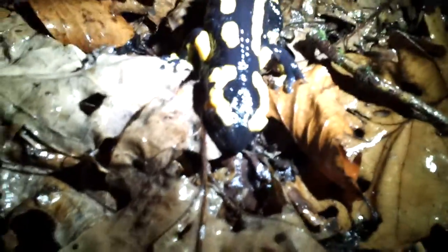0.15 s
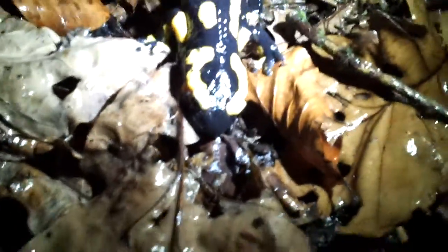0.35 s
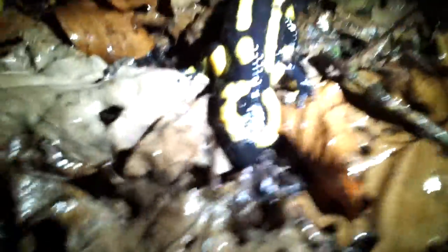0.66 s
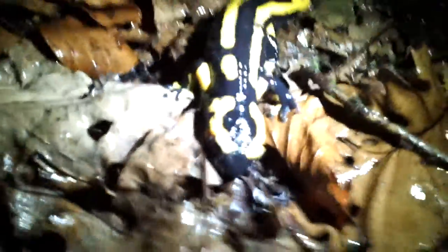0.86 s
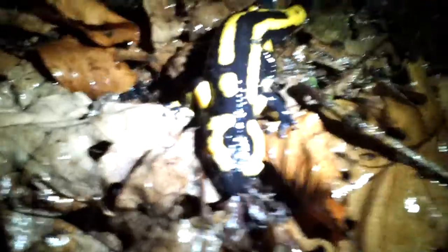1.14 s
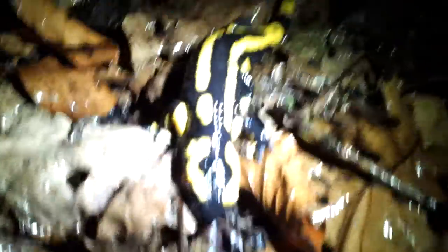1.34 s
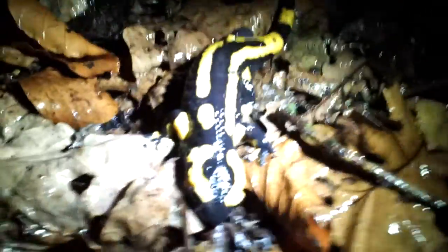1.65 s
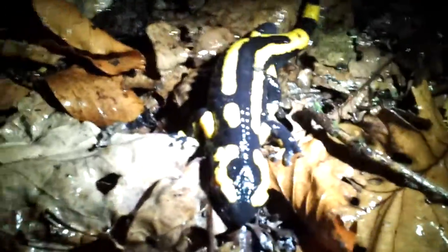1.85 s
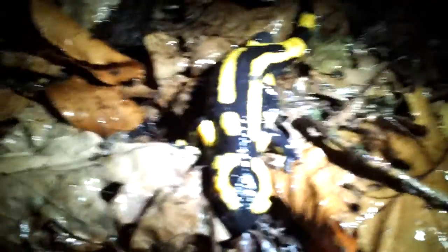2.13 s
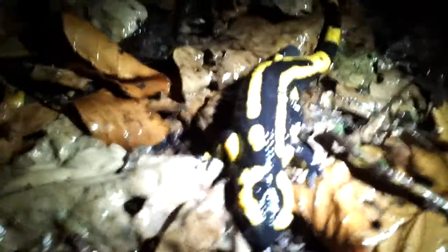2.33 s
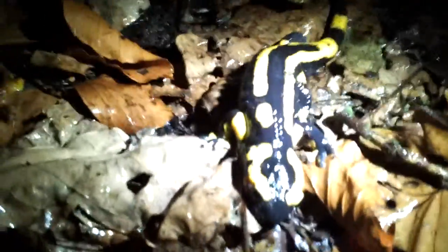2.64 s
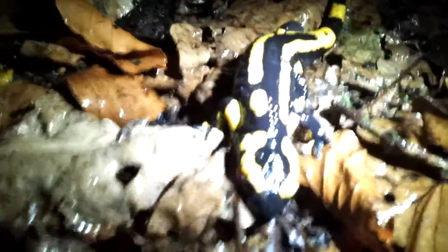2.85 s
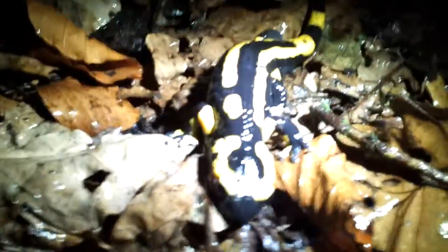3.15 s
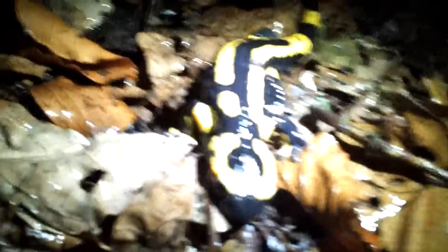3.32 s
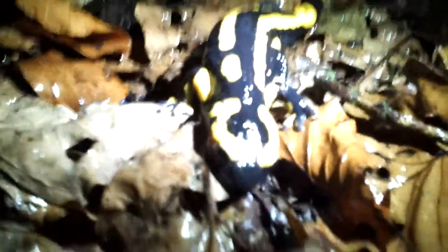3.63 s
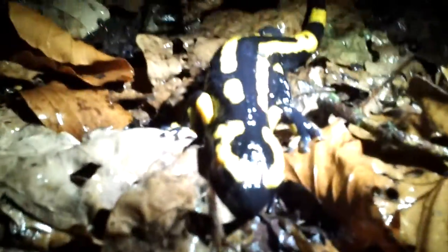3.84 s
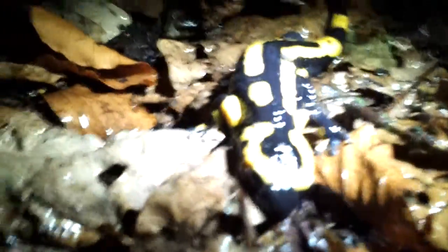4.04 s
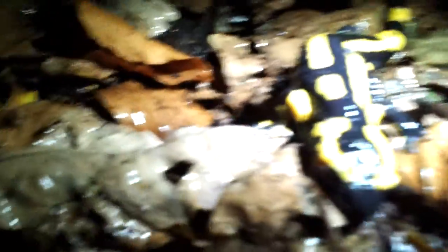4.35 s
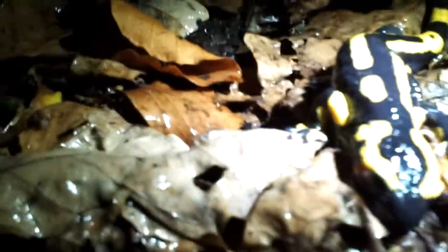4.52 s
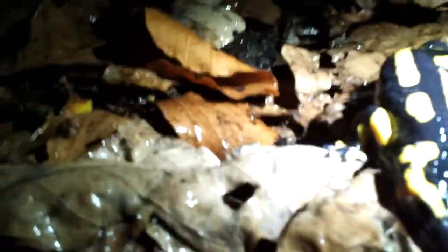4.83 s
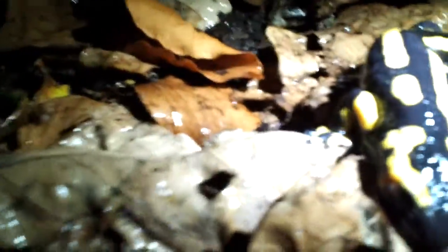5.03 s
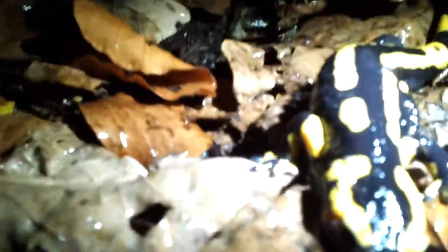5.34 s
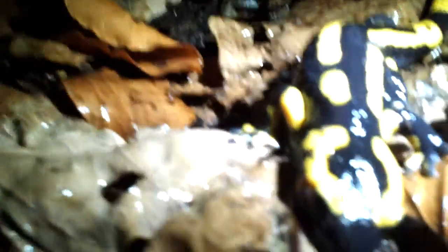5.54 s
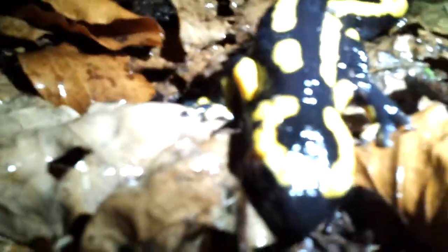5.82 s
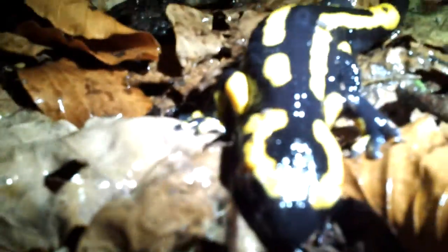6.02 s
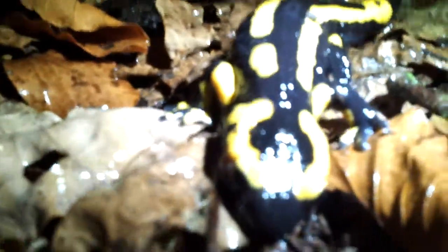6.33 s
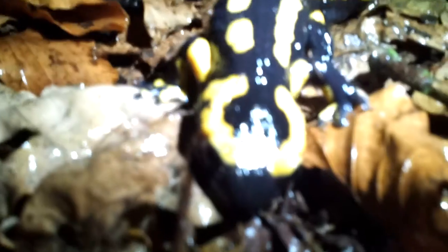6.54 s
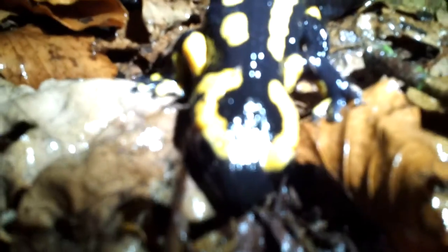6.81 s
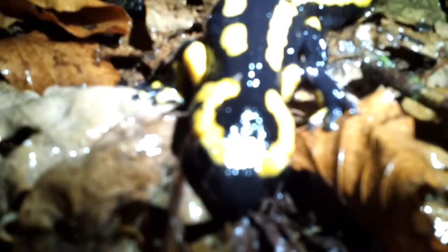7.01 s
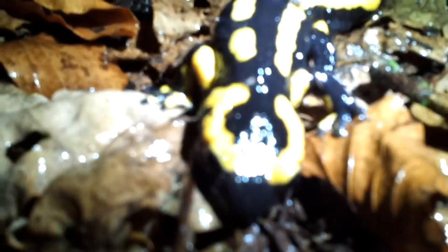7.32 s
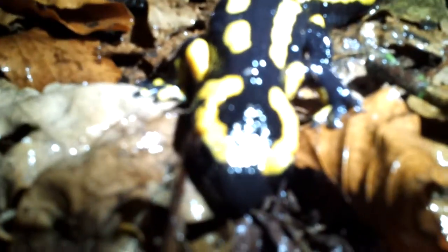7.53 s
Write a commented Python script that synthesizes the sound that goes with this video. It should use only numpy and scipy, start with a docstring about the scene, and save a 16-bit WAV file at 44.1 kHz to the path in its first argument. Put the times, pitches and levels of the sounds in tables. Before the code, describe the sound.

Steady rain on a wet forest floor: a constant airy hiss and fine patter of drops on leaves, with crisp ticks landing close by at irregular moments. A handheld microphone near the ground adds soft low rumble and faint knocks, over a distant roar that swells and sinks. Just before four seconds a finger brushes the device, ending in a loud thump with a short hollow ring, and the rain carries on.

```python
"""Steady rain on the wet leaf litter of a forest floor, heard from a hand-held camera close to the ground.
From the start there is the wash and hiss of far rain, made of filtered noise, under a fine patter of rung leaves.
The hand rumbles (deep noise) and knocks faintly on the case (dying swings); a far roar swells and sinks.
Near drops tick on single leaves as short noisy blows that set off resonances.
Just before 4 s the grip shifts: a finger brushes the camera (noisy slips) and bumps its case into ringing."""
import sys
import numpy as np
from scipy import signal
from scipy.fft import rfft, irfft, next_fast_len
from scipy.io import wavfile
from scipy.ndimage import uniform_filter1d

SR = 44100
rng = np.random.default_rng(int(sys.argv[2]) if len(sys.argv) > 2 else 0)


def inscribe(sig):
    """Save sig as 16-bit PCM at rate SR to the path in sys.argv[1].

    A 1-D sig is mono; a 2-D sig holds one channel per row.
    Samples are clipped to [-1, 1] before scaling.
    """
    pcm = np.round(np.clip(np.atleast_2d(sig).T, -1, 1) * 32767)
    wavfile.write(sys.argv[1], SR, pcm.astype(np.int16))


N = 338247  # length in samples

# How hard it rains. Each row: time in seconds, strength in dB.
RAIN_STRENGTH = [(0, -1), (.45, -0.5), (1.35, -0.5), (1.8, 2.5), (2.25, -0.1), (2.7, 0.3), (3.05, 1),
                 (3.6, 0.2), (4.9, -1), (5.2, 0.2), (5.65, -0.6), (6.15, 1.1), (6.65, -1), (7.67, -.8)]
# The finger lands, bears down hardest, bumps the case, and has left (seconds).
TOUCH_S, PRESS_S, BUMP_S, LIFT_S = 3.83, 3.9085, 3.9092, 3.966


def amp(db):
    """Turns dB into a gain."""
    return 10 ** (np.asarray(db) / 20)


def evened(x):
    """Scales a sound to an rms (average strength) of 1."""
    return x / np.sqrt(np.mean(x ** 2) + 1e-20)


def add(mix, s, sound):
    """Mixes a sound in at time s (seconds), cutting off what runs past the end."""
    start = max(round(s * SR), 0)
    part = mix[start:][:len(sound)]
    part += sound[:len(part)]  # part is a view, so this changes the mix itself


def level(rows):
    """Turns (seconds, dB) rows into a gain for every sample, with straight lines in dB between rows."""
    s, db = np.transpose(rows)
    return amp(np.interp(np.arange(N) / SR, s, db))


def colour(x, points):
    """Filters x by a spectrum given as (Hz, dB) points, joined along a logarithmic pitch scale."""
    size = next_fast_len(len(x) + 4096)
    f, db = np.transpose(points)
    log_hz = np.log(np.fft.rfftfreq(size, 1 / SR) + 1)  # + 1 avoids the logarithm of zero
    gain = amp(np.interp(log_hz, np.log(f), db))
    return irfft(rfft(x, size) * gain, size)[:len(x)]


def noise(points):
    """Noise of rms 1 with a given spectrum."""
    return evened(colour(rng.standard_normal(N), points))


def waver(depth_db, rate_hz, count=24):
    """A gain that drifts by chance: slow sines up to rate_hz are summed, and depth_db is their rms."""
    s = np.arange(0, N / SR + .02, .01)
    drift = np.zeros(len(s))
    for hz in np.geomspace(rate_hz / 10, rate_hz, count):
        drift += np.sin(2 * np.pi * (hz * s + rng.random()))
    return level(np.transpose([s, depth_db * evened(drift)]))


def resonate(x, hz, width_hz):
    """A damped resonance with no response at zero Hz; the wider it is, the sooner it dies."""
    r = np.exp(-np.pi * width_hz / SR)
    return signal.lfilter([1, 0, -1], [1, -2 * r * np.cos(2 * np.pi * hz / SR), r * r], x)


def impact(hz, width_hz, decay, spatter):
    """A blow and its dying spatter ring a resonance; the energy is that of 1 ms at rms 1."""
    t = np.arange(1400) / SR
    force = rng.standard_normal(len(t)) * np.exp(-t / max(decay, 1e-4))
    force *= spatter / np.linalg.norm(force)
    force[0] += 1  # the first blow
    ring = resonate(force, hz, width_hz)
    ring = resonate(ring, hz, 2 * width_hz)
    return ring / np.linalg.norm(ring) * np.sqrt(SR / 1000)


def patter(per_s, low_hz, high_hz, width_hz, spread_db, decay, count=32):
    """Many small drops of uneven size, each falling at random on one of a set of leaves."""
    out = np.zeros(N)
    for hz in np.geomspace(low_hz, high_hz, count):
        size = amp(spread_db * np.minimum(rng.exponential(1, N), 3))
        hits = size * (rng.random(N) < per_s / count / SR)
        out += signal.oaconvolve(hits, impact(hz, width_hz, decay, 1.54))[:N]
    return evened(out)


def grip(before_db):
    """A gain that holds until the finger presses hardest, then settles to 1 as it leaves."""
    return level([(PRESS_S, before_db), (LIFT_S, 0)])


def rain(wash_db=-49.7, hiss_db=-43.8, fine_db=-48.0, taps_db=-56.5, wash_follows=0.6):
    """Far rain merges into a wash and a hiss; nearer drops stand out as fine patter and duller taps."""
    # Spectra of the far rain. Each row: frequency in Hz, density in dB per Hz.
    wash_points = [(200, -12.5), (500, -1), (800, -2), (1100, -.5), (2100, -2), (3000, -1), (3900, -1),
                   (5000, -13.5), (7500, -15)]
    hiss_points = [(900, -25), (2400, -9), (3300, -8.5), (4200, -3), (5000, -1.5), (5800, 0), (6700, -1),
                   (7500, -7.5)]
    fine = patter(per_s=600, low_hz=3320, high_hz=7640, width_hz=1630, spread_db=1.0, decay=0.0025)
    taps = patter(per_s=70, low_hz=1110, high_hz=4560, width_hz=2400, spread_db=6.0, decay=0.0018)
    body = amp(wash_db) * noise(wash_points) + amp(taps_db) * taps
    top = amp(hiss_db) * noise(hiss_points) + amp(fine_db) * fine
    strength = level(RAIN_STRENGTH)
    # The body follows the strength of the rain less than the top does.
    body = strength ** wash_follows * grip(before_db=2.5) * body
    top = strength * grip(before_db=0.22) * top
    return (body + top) * waver(depth_db=0.54, rate_hz=9.9)


def beside_finger(x, delay=0.000488, echo=0.19):
    """Until the bump, a finger by the microphone reflects the rain, and the delayed copy sounds hollow."""
    t = np.arange(N) / SR
    reflection = np.interp(t - delay, t, x)
    return x + echo * (t < BUMP_S) * reflection


def low_background(rumble_db=-1, roar_db=-.5, top_db=-1):
    """The hand rumbles on the case, under a far roar that swells, brightens and sinks."""
    # Spectra of the rumble and of the roar's deep and upper parts.
    # Each row: frequency in Hz, density in dB per Hz.
    rumble_points = [(12, -25), (25, -11), (45, -0.5), (62, -6), (82, -0.5), (110, -13), (200, -26),
                     (500, -47.5)]
    roar_points = [(60, -18), (105, -2.5), (145, 3.5), (200, -6), (260, -14), (500, -36.5)]
    top_points = [(150, -15), (230, 0), (300, 1), (380, -2), (550, -3.5), (750, -12), (1500, -25.5)]
    # Their rise and fall. Each row: time in seconds, level in dB before the trims in the first line.
    hand_level = [(0, -51), (.28, -41), (.6, -46.5), (.95, -43.5), (1.7, -49.5), (2.5, -46.5),
                  (3.35, -46.5), (4.5, -50), (5.8, -43.5), (6.7, -52), (7.55, -44.5)]
    roar_level = [(0, -51), (.65, -52.5), (.95, -48.5), (1.2, -52), (1.65, -54), (2.02, -44.5),
                  (2.3, -51.5), (2.95, -52.5), (3.33, -46.5), (3.7, -52), (4.3, -46.5), (4.85, -49),
                  (5.6, -45.5), (6.45, -51.5), (7.67, -51.5)]
    top_level = [(0, -53.5), (1.7, -56.5), (2.16, -51.5), (2.55, -58.5), (3.35, -52.5), (4.3, -49.5),
                 (4.9, -52.5), (5.58, -48), (6.3, -51.5), (7.25, -52.5), (7.67, -50)]
    unsteady = waver(depth_db=1.15, rate_hz=7)
    rumble = amp(rumble_db) * level(hand_level) * unsteady * noise(rumble_points)
    roar = amp(roar_db) * level(roar_level) * noise(roar_points)
    top = amp(top_db) * level(top_level) * noise(top_points)
    return rumble + roar + top


def knocks(clack_hz=800, clack_width_hz=1000, clack_decay=0.0028):
    """Each knock is a hard clack and a push that swings back and dies within a cycle or two."""
    # Dull knocks on the case. Each row: start in seconds, push level in dB, push pitch in Hz,
    # push decay in seconds, clack level in dB.
    knock_rows = [(0.0816, -22, 69.5, .0037, -34.5), (0.5885, -19.5, 438, 0.0018, -25.5),
                  (0.9626, -28, 427, 0.0023, -35), (3.909, -5.5, 76.4, .0088, -22),
                  (6.0503, -25, 362, 0.0023, -28.5), (7.525, -29, 450, .0013, -38)]
    out = np.zeros(N)
    t = np.arange(4000) / SR
    for s, push_db, hz, decay, clack_db in knock_rows:
        push = np.sin(2 * np.pi * hz * t) * np.exp(-t / decay)
        clack = impact(clack_hz, clack_width_hz, clack_decay, 1)
        add(out, s, amp(push_db) * push)
        add(out, s, amp(clack_db) * clack)
    return out


def drop(leaf_db, leaf_hz, splash_db, splash_hz, slap_db, decay, leaf_width_hz=1300, splash_width_hz=1400,
         slap_hz=1400, slap_width_hz=2200, spatter_per_s=650):
    """A drop slaps a leaf, rings it and splashes; the longer it spatters, the softer its first blow."""
    spatter = spatter_per_s * decay
    ring = amp(leaf_db) * impact(leaf_hz, leaf_width_hz, decay, spatter)
    splash = amp(splash_db) * impact(splash_hz, splash_width_hz, decay, spatter)
    slap = amp(slap_db) * impact(slap_hz, slap_width_hz, decay, spatter)
    return ring + splash + slap


def near_drops():
    """The drops that land closest to the microphone, each with its own ring, splash and slap."""
    # The loudest drops. Each row: start in seconds, leaf ring in dB, leaf ring in Hz, splash in dB,
    # splash in Hz, dull slap in dB, spatter decay in seconds. The dB count energy spread over 1 ms.
    drop_rows = [(0.186, -31, 2350, -19, 7500, -24, 0.0025), (.2965, -42, 5040, -22.5, 6070, -47, .0024),
                 (0.413, -16.5, 2820, -16, 6360, -28, 0.0017),
                 (0.4622, -26, 4390, -34.5, 5900, -29.5, 0.0032),
                 (.466, -35, 4640, -22.5, 6760, -46, .0031), (.5738, -32, 4950, -31, 5300, -49, .0012),
                 (0.7794, -28, 4050, -27, 5870, -33, 0.0027), (0.8676, -31.5, 3770, -35, 6170, -31, .0028),
                 (.949, -31, 3900, -34, 5900, -29, 0.0027), (1.0714, -14.5, 4400, -17.5, 5940, -27, .0021),
                 (1.24, -34, 3300, -43, 6030, -27.5, .0026), (1.6167, -19, 3980, -15.5, 5950, -41, 0.0011),
                 (1.63, -15.5, 3920, -12, 5500, -32, 0.0019), (1.8757, -20, 4580, -18.5, 6050, -53, .0035),
                 (1.8844, -25, 4040, -28, 5930, -49, .0012),
                 (1.912, -20.5, 4000, -23.5, 6380, -25.5, 0.0041),
                 (2.0967, -26, 4960, -27.5, 5670, -34, 0.0044),
                 (2.6825, -36, 2600, -18.5, 6300, -37, .0025), (2.7812, -28, 4000, -36, 5950, -41, .0044),
                 (2.9217, -38, 4090, -32, 6200, -31.5, 0.002), (2.9484, -34, 5030, -25.5, 5720, -33, .0008),
                 (2.9939, -29, 2850, -33, 5600, -32, .003), (3.035, -28, 5010, -16.5, 6500, -39, .00065),
                 (3.062, -27.5, 4340, -33, 5790, -51, 0.0042), (3.1638, -10, 4580, -28, 6350, -28.5, .0011),
                 (3.2144, -43, 3040, -44, 6280, -29, 0.0038), (3.2785, -34, 3240, -32, 6010, -30, .0063),
                 (3.3496, -21.5, 4140, -23.5, 5900, -32, .0019),
                 (3.4311, -27.5, 2520, -24.5, 6500, -27.5, 0.0033),
                 (3.831, -29, 3920, -24.5, 6600, -42, .004), (4.0304, -38, 5000, -23, 6830, -42, 0.0017),
                 (4.0952, -30.5, 3950, -33, 5600, -39, .0027), (4.5905, -46, 3210, -36, 6750, -31.5, .0015),
                 (4.6173, -25, 4900, -26, 5800, -49, 0.0023),
                 (5.0694, -27.5, 5000, -32, 5720, -39.5, 0.00098),
                 (5.162, -27.5, 4240, -38, 5650, -33.5, 0.00058),
                 (5.2389, -30, 5050, -23.5, 5630, -33, .002), (6.0416, -25, 2920, -41, 5500, -44, 0.0063),
                 (6.05, -24, 4800, -24, 6080, -31.5, .003), (6.0769, -24.5, 3970, -27, 6250, -38, .0015),
                 (6.2087, -24.5, 3800, -31, 6560, -33.5, 0.00093),
                 (6.2543, -25.5, 4300, -32, 5840, -43, .0033), (6.3551, -42, 4160, -42, 5410, -32, 0.0024),
                 (6.448, -37, 3600, -40, 5900, -33.5, .002), (6.4836, -34, 5070, -28, 5480, -34.5, 0.0014),
                 (7.2892, -22, 4750, -23, 5550, -50, 0.0027),
                 (7.6332, -26.5, 4940, -24.5, 6600, -33, .0022)]
    out = np.zeros(N)
    for s, *strike in drop_rows:
        add(out, s, drop(*strike))
    return out


def stray_drops(leaf_db=-35, splash_db=-34, slap_db=-43, spread_db=5, low_hz=3200, high_hz=5100,
                splash_hz=6100, decay=.0022, count=34):
    """Fainter drops a step further off land at random moments, each on a leaf of its own."""
    out = np.zeros(N)
    for when, pitch, ring, splash, slap in rng.random((count, 5)):
        # Each part is up to spread_db louder or softer than its middle level.
        leaf, wet, dull = spread_db * (2 * np.array([ring, splash, slap]) - 1)
        leaf_hz = low_hz + pitch * (high_hz - low_hz)
        sound = drop(leaf_db + leaf, leaf_hz, splash_db + wet, splash_hz, slap_db + dull, decay)
        add(out, when * N / SR, sound)
    return level(RAIN_STRENGTH) * out


def forest(x, t60=0.092, wet_db=-17):
    """Leaves and trunks scatter a short, faint tail of noise that falls by 60 dB in t60 seconds."""
    t = np.arange(SR // 5) / SR
    tail = rng.standard_normal(len(t)) * amp(-60 * t / t60)
    tail /= np.linalg.norm(tail)
    return x + amp(wet_db) * signal.oaconvolve(x, tail)[:N]


def friction(points):
    """Tiny slips of uneven size, bunched over a few milliseconds, coloured by a spectrum."""
    bunching = evened(uniform_filter1d(rng.standard_normal(N), size=90))
    slips = rng.standard_normal(N) * (rng.random(N) < 8000 / SR)  # about 8000 slips per second
    return evened(colour(slips * amp(3 * np.tanh(bunching)), points))


def stroke(drag_db, grow_db_per_s, press_db, lead_s, width_s, attack_s=0.0068, release_s=0.023):
    """The loudness of a light drag that grows and eases, with one short hard press in the middle."""
    t = np.arange(N) / SR
    landing = (t - TOUCH_S) / attack_s
    leaving = (LIFT_S - t) / release_s
    contact = np.clip(np.minimum(landing, leaving), 0, 1)
    drag = amp(drag_db - grow_db_per_s * abs(t - PRESS_S))
    press = amp(press_db) * np.exp(-((t - PRESS_S + lead_s) / width_s) ** 2)
    return contact * (drag + press)


def brush(ring_db=-20):
    """A finger swishes over the camera, scrapes as it presses harder, and bumps the case into ringing."""
    # Spectra of the light swish and the hard scrape. Each row: frequency in Hz, density in dB per Hz.
    swish_points = [(300, -9.5), (1000, -2.5), (2500, 2), (4000, 6), (5700, 2.5), (7000, -13.5),
                    (8000, -31)]
    scrape_points = [(25, -11.5), (70, 2.5), (250, -3.5), (600, -8), (1000, -12), (1800, -17.5),
                     (3500, -15.5), (7000, -50)]
    # Ringing tones of the case. Each row: frequency in Hz, level in dB before ring_db is added,
    # time to fall by 60 dB in seconds.
    case_modes = [(301, -10.5, 0.061), (419, -0.5, 0.085), (536, 6, 0.061), (696, 0.5, 0.078),
                  (811, -3, 0.066), (1115, -2, .07), (2109, -5.5, 0.083)]
    swish = stroke(drag_db=-28.5, grow_db_per_s=69, press_db=-28.5, lead_s=0.0018, width_s=0.011)
    swish = swish * friction(swish_points)
    scrape = stroke(drag_db=-25.5, grow_db_per_s=149, press_db=-19.5, lead_s=-.004, width_s=.01,
                    attack_s=0.024)
    scrape = scrape * friction(scrape_points)
    out = swish + scrape
    t = np.arange(SR // 4) / SR
    case = np.zeros(len(t))
    for hz, db, t60 in case_modes:
        case += amp(db - 60 * t / t60) * np.sin(2 * np.pi * hz * t)
    add(out, BUMP_S, amp(ring_db) * case)
    return out


def scene():
    """Rain on the leaves, the low background, and the hand on the camera."""
    drops = forest(near_drops() + stray_drops())
    steady_rain = beside_finger(rain())
    return (drops + steady_rain + low_background() + knocks() + brush())[None]


def record(dry, ceiling=0.61):
    """Flattens the very loudest peaks and dulls the top above about 7 kHz."""
    # Overall tone: full up to about 7 kHz, then a steep fall, with a faint band near 8.5 kHz.
    # Each row: frequency in Hz, gain in dB.
    tone_points = [(8, -21.5), (30, 1.5), (6700, 0.5), (7100, -0.5), (7480, -6.5), (7750, -28),
                   (8050, -44.5), (8500, -19.5), (8900, -25.5), (9300, -62)]
    heard = colour(np.clip(dry[0], -ceiling, ceiling), tone_points)
    low_pass = signal.firwin(511, 9100, window=("kaiser", 9), fs=SR)  # upper edge at 9100 Hz
    return signal.oaconvolve(heard, low_pass, "same")[None]


dry = scene()
out = record(dry)
inscribe(out)
```